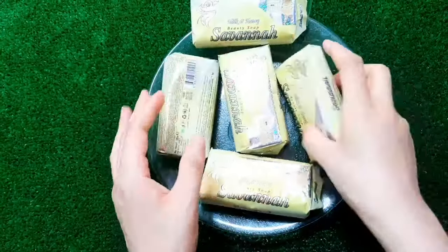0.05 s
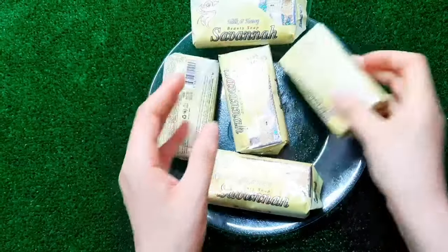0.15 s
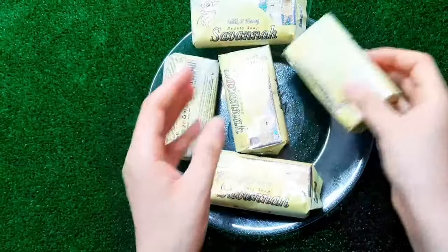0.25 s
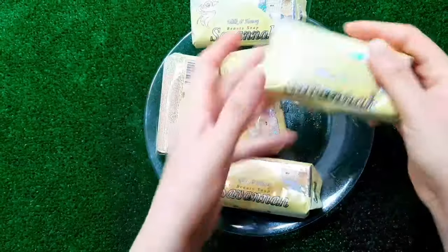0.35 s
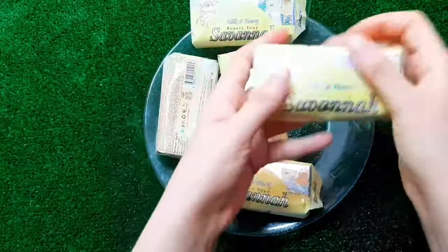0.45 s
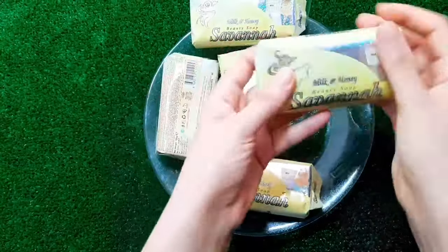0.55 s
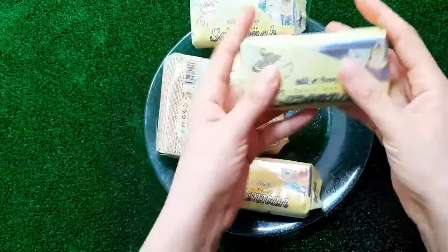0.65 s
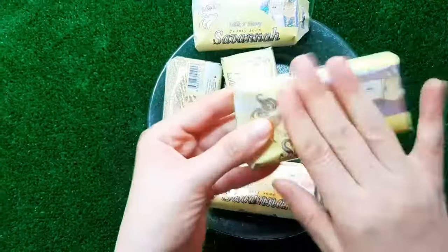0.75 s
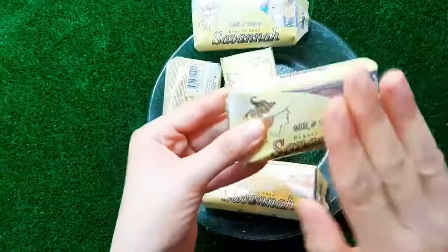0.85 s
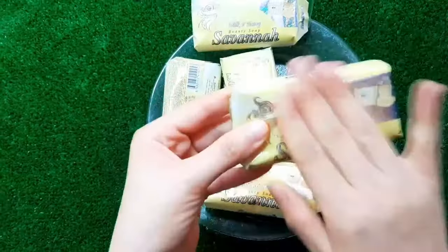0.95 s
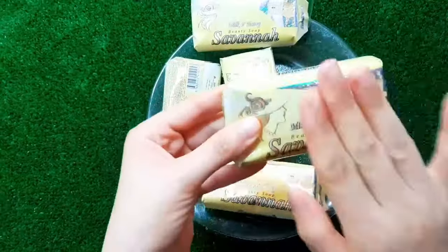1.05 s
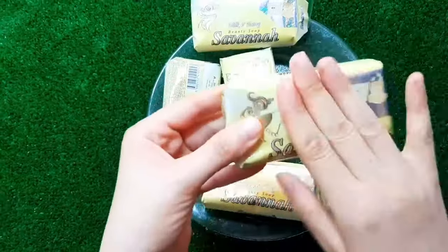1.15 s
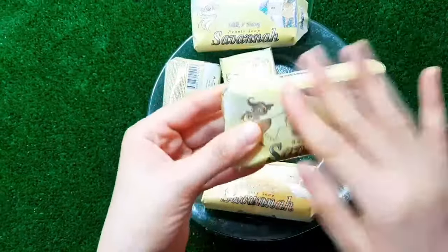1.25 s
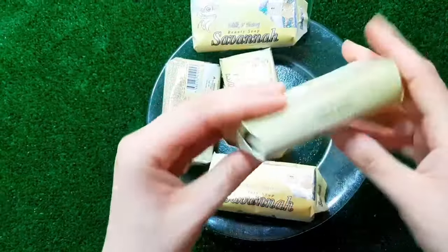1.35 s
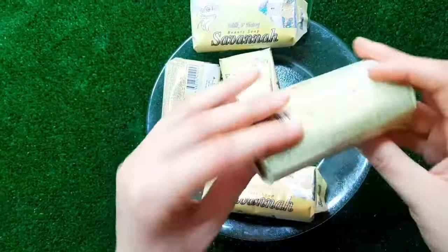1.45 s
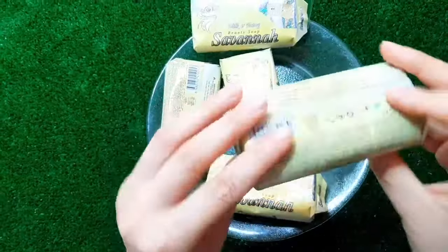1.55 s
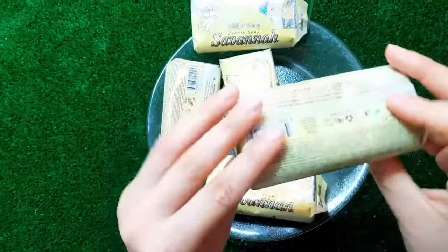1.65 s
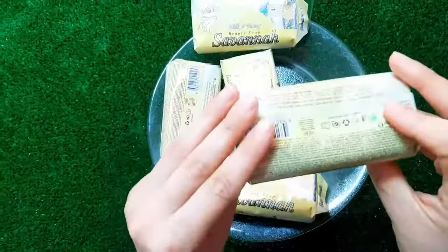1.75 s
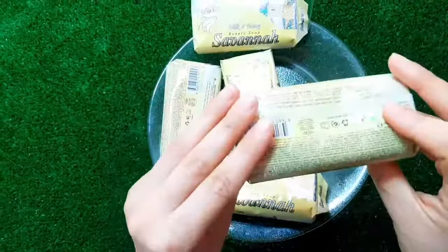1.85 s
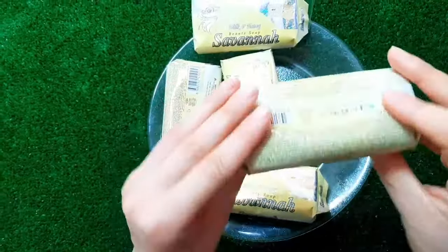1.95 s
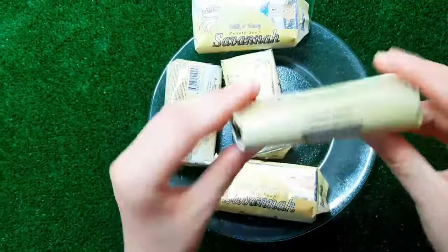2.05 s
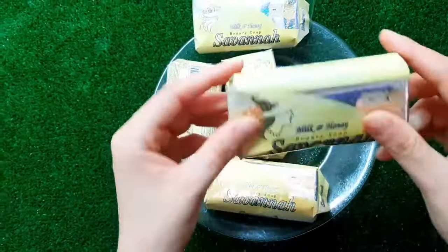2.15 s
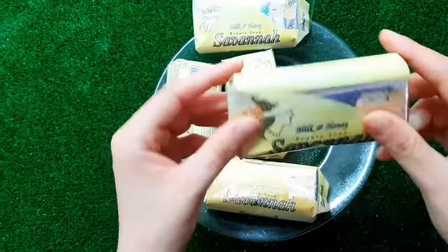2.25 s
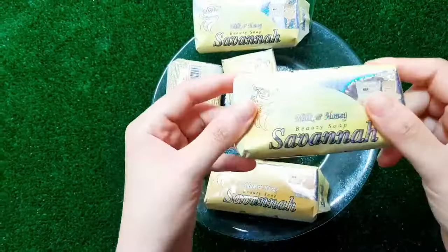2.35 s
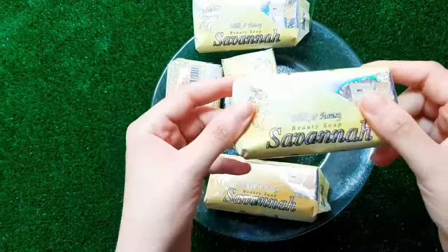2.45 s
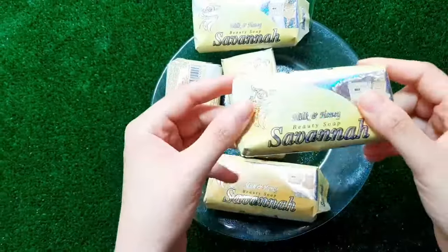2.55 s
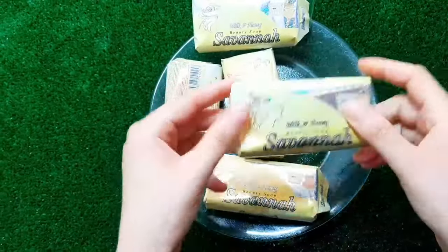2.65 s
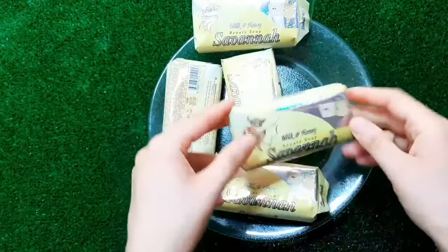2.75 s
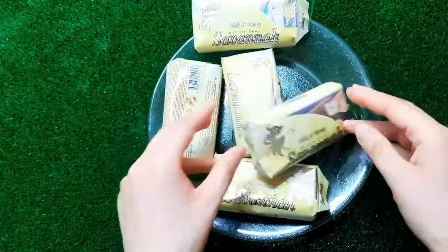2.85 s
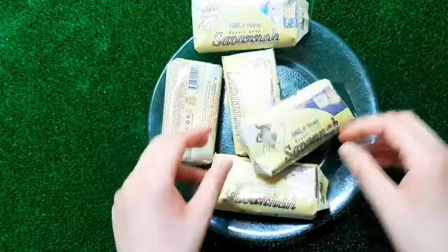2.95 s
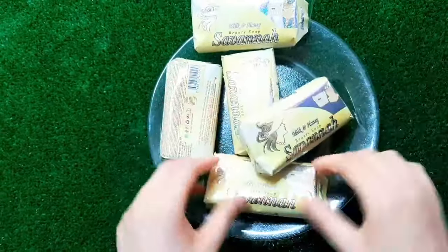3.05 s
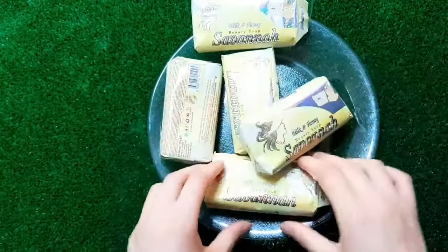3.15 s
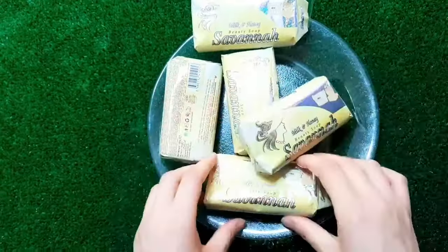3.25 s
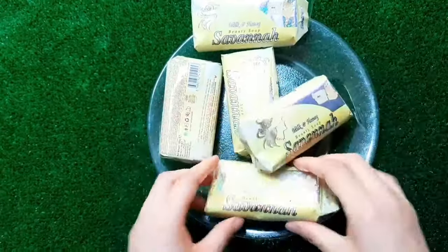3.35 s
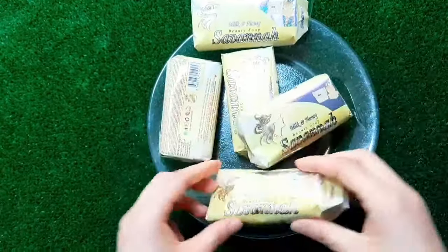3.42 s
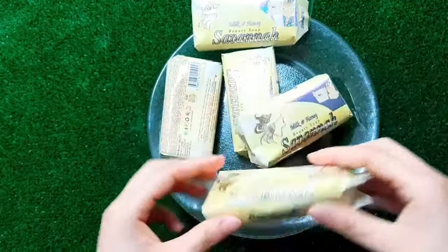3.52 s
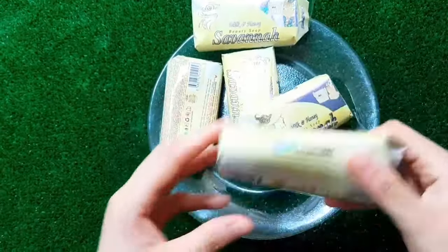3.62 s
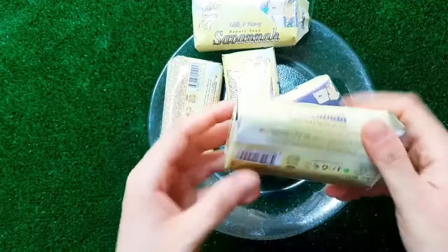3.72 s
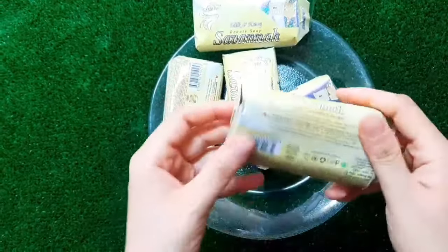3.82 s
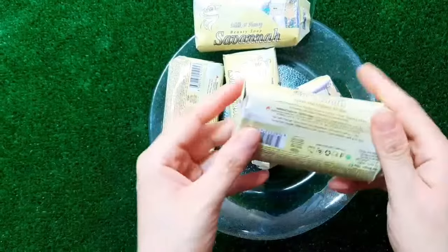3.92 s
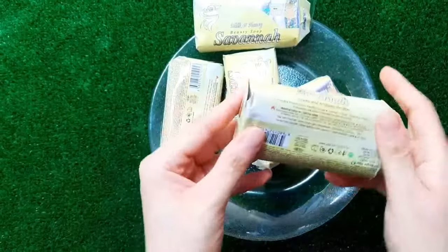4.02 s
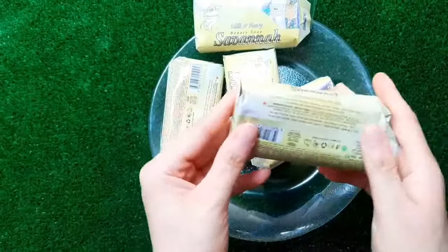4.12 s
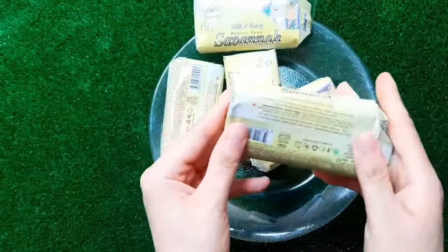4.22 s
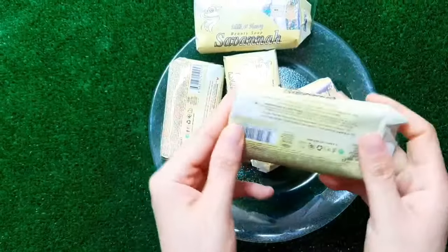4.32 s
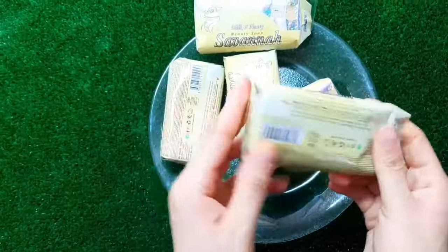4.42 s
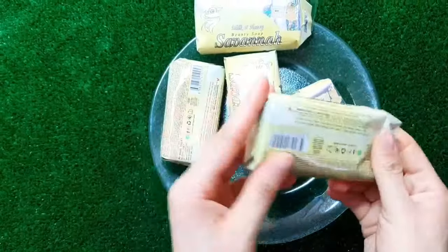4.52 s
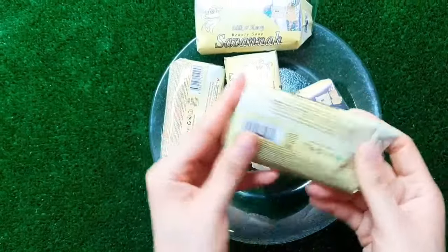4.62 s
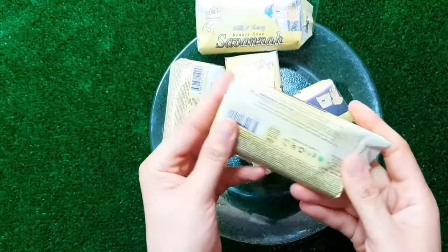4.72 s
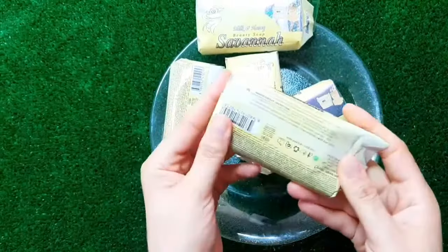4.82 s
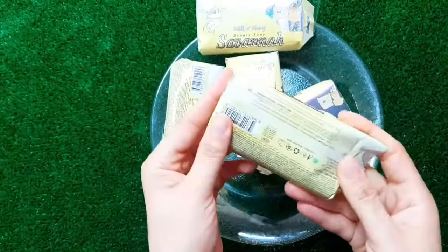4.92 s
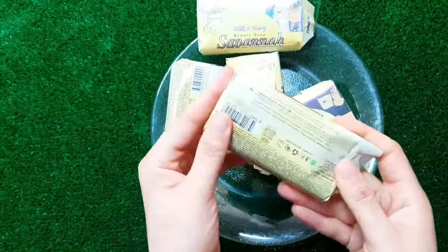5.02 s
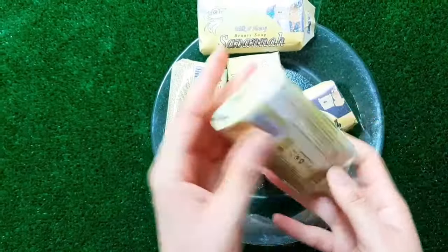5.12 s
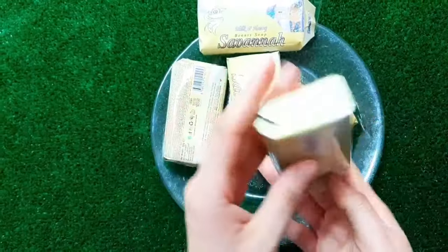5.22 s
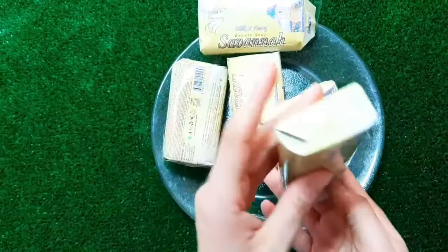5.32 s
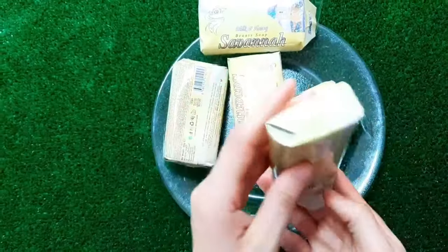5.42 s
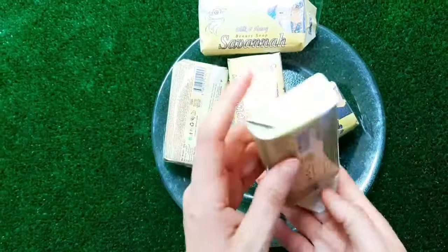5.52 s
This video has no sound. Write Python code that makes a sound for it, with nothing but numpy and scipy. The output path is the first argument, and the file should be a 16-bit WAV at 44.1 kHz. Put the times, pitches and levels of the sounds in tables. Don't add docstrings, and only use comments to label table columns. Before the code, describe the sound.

Hands turn and squeeze soap bars in stiff paper very close to the microphone. Soft rustling leads to three hard slaps within the first second or so, then sparse ticks. Near the middle a bar drops with a brief clank on a plate, followed by busy crinkling and snaps. Small, dry room; paper on the left, dull rumble on the right.

```python
import sys
import numpy as np
from scipy import signal
from scipy.fft import rfft, irfft
from scipy.io import wavfile
from scipy.ndimage import uniform_filter1d, map_coordinates

SR = 44100
rng = np.random.default_rng(int(sys.argv[2]) if len(sys.argv) > 2 else 0)


def volts_from_db(level):
    exponent = np.asarray(level, float) / 20
    return 10 ** exponent


def transcribe(u):
    v = np.clip(np.atleast_2d(u).T, -1, 1)
    q = np.round(v * 32767).astype(np.int16)
    wavfile.write(sys.argv[1], SR, q)


N = 245637
TIME = np.arange(N) / SR

# f/Hz, level/dB per Hz
CRACK = [(1200, -38.5), (2200, 5), (4000, 3), (6400, 5.5), (7600, -4.5), (9500, -35.5)]
SHEET = [(450, -31), (800, 0.5), (1200, 5), (1800, 2), (2600, -5.5), (4000, -43.5)]
THUD = [(70, -22.5), (180, -2.5), (350, 1), (550, -3.5), (780, -16), (1300, -37.5)]
SIZZLE = [(6000, -23.5), (8200, 1), (12000, 3.5), (15500, -2)]
# t/s, rumble level/dB
LEAN = [(0, -50), (0.4, -51), (1.0, -59), (2.4, -71), (2.6, -74.5), (2.8, -84), (3.0, -62.5), (3.4, -61.5),
        (3.8, -65), (4.0, -71), (4.4, -71), (4.6, -45.5), (4.8, -68.5), (5.0, -67), (5.57, -65.5)]


def unit(x):
    return x / np.sqrt(np.mean(x ** 2) + 1e-20)


def peak(x):
    return x / np.abs(x).max()


def along(points, hz):
    f, v = np.transpose(points)
    return np.interp(np.log(hz + 1), np.log(f + 1), v)


def curves(rows):
    s, *cols = np.transpose(rows)
    return [np.interp(TIME, s, c) for c in cols]


def wobble(rate):
    return map_coordinates(rng.standard_normal(int(N * rate / SR) + 4), [TIME * rate])


def coloured(x, spectrum, size=8192):
    cep = irfft(np.log(volts_from_db(along(spectrum, np.fft.rfftfreq(size, 1 / SR)))))
    cep[1:size // 2] *= 2
    cep[size // 2 + 1:] = 0
    h = irfft(np.exp(rfft(cep)))[:size // 2]
    h = h.reshape((1,) * (x.ndim - 1) + (-1,))
    return signal.fftconvolve(x, h, axes=-1)[..., :x.shape[-1]]


def noise(spectrum):
    return unit(coloured(rng.standard_normal(N), spectrum))


def add(track, s, piece):
    part = track[round(s * SR):][:len(piece)]
    part += piece[:len(part)]


def swells(rows):
    t = TIME[::15]
    gains = [volts_from_db(db - 20 * np.maximum((s - t) / rise, (t - s) / fall)) for s, db, rise, fall, *_ in rows]
    return np.repeat(gains, 15, axis=1)[:, :N]


def to_db(*gains):
    return 10 * np.log10(sum(np.sum(np.atleast_2d(g) ** 2, axis=0) for g in gains))


def walls(x, size=SR // 3):
    # f/Hz, t60/s
    decay = [(150, .11), (420, .22), (1500, .2), (4000, .18), (8000, .14), (15000, .13)]
    hz, t, z = signal.stft(rng.standard_normal(size), SR, nperseg=128)
    tail = signal.istft(z * volts_from_db(-60 * t / along(decay, hz)[:, None]), SR, nperseg=128)[1]
    tail = tail * (1 - np.exp(-np.arange(len(tail)) / SR / .002))
    return signal.fftconvolve(np.pad(x, (200, 0)), tail / np.linalg.norm(tail))


def burst(colour, t60, rise):
    t = np.arange(1536) / SR
    fade = volts_from_db(-60 * t / (.5 * t60)) + .3 * volts_from_db(-60 * (t / t60) ** 1.17)
    attack = (1 - np.exp(-t / rise)) ** 2
    return coloured(rng.standard_normal(len(t)) * fade * attack, colour, size=1024)


def pitched(x, hz, long):
    ring = signal.lfilter(*signal.iirpeak(hz, hz / 1500, SR), x)
    return min(hz / 4000, 1) ** 2 * x + 4.5 / long ** 1.2 * ring


def snaps():
    out = np.zeros(N)
    impulse = 1. * (np.arange(1536) == 0)
    clicks = [coloured(impulse, colour, size=1024) for colour in (CRACK, SHEET, THUD, SIZZLE)]
    for s, db, hz, sheet_db, thud_db, sizzle_db in buckles():
        long = 1 + 1.1 * volts_from_db(db)
        crack = peak(pitched(burst(CRACK, 0.0092 * long, 0.00008 * long), hz, long))
        sheet = volts_from_db(sheet_db - 1.74) * peak(burst(SHEET, 0.015 * long, 0.00006))
        thud = volts_from_db(thud_db - 0.9) * peak(burst(THUD, 0.016, 0.00024))
        sizzle = volts_from_db(sizzle_db + 2.5) * peak(burst(SIZZLE, 0.0044 * long, 0.00037))
        layers = crack, sheet, thud, sizzle
        direct = sum(layers)
        add(out, s - .0001, volts_from_db(db - 1.72) * direct)

        echo = np.convolve(direct, rng.standard_normal(130) * np.hanning(130))
        add(out, s + .0058, volts_from_db(db - 16.5) * peak(echo))

        smooth = [pitched(clicks[0], hz, long), *clicks[1:]]
        spread = sum(click * np.linalg.norm(x) / np.linalg.norm(click)
                     for click, x in zip(smooth, layers))
        size = SR // 3 if long > 1.2 else SR // 7
        add(out, s, volts_from_db(db - 17.5) * long * walls(spread, size))
    return out


def buckles():
    # t/s, crack peak level/dB, crack f/Hz, sheet level/dB re crack, bar thud level/dB re crack
    slaps = [(0.7491, -27, 5010, 2.5, 6), (0.751, -11, 2993, 1, 0.5), (0.7517, -2, 3800, -2.5, -6),
             (0.753, -5, 4600, -4.5, -3.5), (0.9617, -13.5, 3000, -3.5, -4.5),
             (0.9625, -3, 4000, -8.5, -10.5), (0.9631, -0.5, 4600, -6.5, -10.5), (1.129, -12, 2600, 0, -6),
             (1.13, -1, 4286, -12, -14.5), (1.1323, -9, 5940, -8, -7.5), (2.8205, -23.5, 5200, 6.5, -18.5),
             (2.826, -3, 3500, -7.5, -14), (3.4767, -1.5, 3920, -4.5, -24.5),
             (3.632, -17.5, 4130, -4.5, -19), (4.2856, -15, 4700, -3.5, -41)]
    presses = [(0.049, -39.5, 3260, -18, 2), (0.495, -22, 3800, -6, -14), (0.577, -18, 2330, 5.5, 1),
               (2.1786, -11, 3950, -2, -18.5), (2.8157, -9.5, 3670, 0, -22.5),
               (2.8185, -9, 2580, 0.5, -17.5), (2.8442, -16.5, 3630, -13, 1),
               (2.852, -14.5, 3300, -5.5, -7.5), (2.886, -22.5, 3650, -0.5, -16),
               (2.978, -20.5, 2300, -3, -11.5), (3.0845, -48, 4880, 14, -8.5), (3.4053, -34, 2730, 19, 2.5),
               (3.4724, -41, 2300, 9, -10), (3.483, -11.5, 5070, -2.5, -11.5), (3.609, -49.5, 3800, -5, 14),
               (3.8316, -20.5, 4800, 5.5, -12.5), (4.314, -21, 3400, -3.5, -10.5),
               (4.706, -32, 4000, 0.5, -10), (4.663, -31.5, 2300, 6, -5), (5.093, -28, 4250, 0, -1.5),
               (1.29, -9.5, 4050, -17.5, -49.5)]
    # t/s, crack peak level/dB, crack f/Hz, sheet level/dB re crack
    folds = [(0.21, -38, 5400, -1), (0.565, -53, 3400, 23), (0.708, -49.5, 3100, 20),
             (0.7174, -18, 4900, -6), (1.342, -24.5, 2610, -5), (2.1553, -39, 2300, 5),
             (2.627, -36, 5640, -25), (2.692, -38, 2310, -4), (2.738, -45.5, 2300, 18),
             (2.763, -30, 6740, -5), (2.889, -23.5, 2300, 7), (3.045, -41, 3300, 8.5),
             (3.099, -23, 3030, -14), (3.757, -28.5, 2860, -2.5), (3.808, -37, 2600, 4),
             (3.8146, -18, 4600, -9), (3.908, -18.5, 3320, -4), (3.948, -19, 3250, -14.5),
             (4.0471, -42.5, 2980, 9), (4.1956, -18, 3500, -3.5), (4.2403, -22.5, 3220, -13),
             (4.2645, -36, 2328, 18.5), (4.899, -51, 6000, 0), (4.955, -49, 2970, 4),
             (5.0655, -44, 2280, -8), (5.1293, -43, 2330, 0), (5.31, -16.5, 3780, -3.5),
             (5.36, -35.5, 3000, 5.5), (5.412, -33, 2400, 5.5), (5.44, -26, 2600, -12),
             (1.332, -34, 2300, 5), (1.357, -26, 2600, 0), (3.7306, -28, 2380, -4), (3.742, -34.5, 2300, 6),
             (3.823, -35, 3400, 2), (3.987, -51, 2800, -8), (4.992, -49, 3920, -5), (4.078, -34.5, 2300, 5),
             (4.089, -32, 3000, -4), (4.205, -37.5, 3880, -6), (5.113, -40, 2570, -9),
             (5.147, -36, 2300, -14), (5.25, -32.5, 2300, 1)]
    # t/s, crack peak level/dB, crack f/Hz, sizzle level/dB re crack
    ticks = [(0.1418, -43, 6360, -18), (0.483, -28.5, 6600, -5), (0.656, -22.5, 5530, -14),
             (1.2544, -23.5, 2950, -19), (1.466, -37.5, 4970, -13.5), (1.5662, -25, 6420, -16.5),
             (2.0142, -36.5, 6250, -10), (2.0335, -32, 6000, -4), (2.043, -26, 6500, -8),
             (2.0576, -16, 6600, -10), (2.169, -25.5, 4840, -10), (2.66, -35, 4780, -17),
             (2.937, -32, 3120, -20), (3.2933, -25.5, 2950, -17), (3.727, -26.5, 4370, -6),
             (3.7409, -45, 5130, -14), (3.854, -14.5, 5500, -19), (3.858, -23, 6300, -20),
             (4.009, -31.5, 5000, -15), (3.011, -36, 4900, -15), (3.106, -24, 3000, -33.5),
             (4.099, -21.5, 5300, -2), (5.462, -37, 1900, -23.5), (4.37, -14.5, 3130, -21.5),
             (4.4683, -28.5, 4300, -10.5), (4.5852, -12.5, 5900, -16.5), (4.6347, -23.5, 2850, -13),
             (4.6415, -24, 5630, -14), (4.656, -27, 2300, -16), (4.522, -47.5, 6500, -16),
             (5.2575, -20, 4150, -11), (3.793, -41, 2900, -14), (4.181, -53, 5350, -10),
             (4.275, -33, 5470, -18), (4.564, -52, 5980, -14), (5.368, -36, 6060, -19)]

    def sizzle(db, hz):
        return db + 2 * np.log2(hz / 4000)

    rows = [(*row, -13 + 0.5 * row[3]) for row in slaps]
    rows += [(*row, sizzle(-21.5, row[2])) for row in presses]
    rows += [(*row, row[3] - 24.5, sizzle(-24.5, row[2])) for row in folds]
    rows += [(s, db, hz, -18.5, -33, sizzle_db) for s, db, hz, sizzle_db in ticks]
    return rows


def rustle():
    level_db, sheet_db, sizzle_db = rubbing()
    clumps = volts_from_db(2.2 * wobble(45) + 2.6 * wobble(170))

    def layer(colour, grains, rub):
        rough = clumps * (grains + rub * rng.standard_normal(N))
        return unit(volts_from_db(1.5 * wobble(60)) * coloured(rough, colour))

    bright = layer(CRACK, creases(260, [2300, 3000, 3900, 5000, 6300], sharpness=3), rub=.55)
    sheet = layer(SHEET, creases(200, [850, 1150, 1550, 2000], sharpness=5), rub=.65)
    thud = layer(THUD, 0, rub=1)
    sizzle = layer(SIZZLE, creases(500, [11000], sharpness=0.52), rub=0.99)
    paper = bright + volts_from_db(sheet_db) * (sheet + 0.59 * thud) + volts_from_db(sizzle_db) * sizzle
    paper = volts_from_db(level_db - 5.0) * unit(patchy(paper, depth_db=2.0)) * np.std(paper)
    return paper + volts_from_db(-6) * walls(paper)[:N]


def rubbing():
    # t/s, rustle level/dB
    firmness = [(0, -59.5), (0.39, -62), (0.45, -44), (0.68, -50.5), (0.9, -62), (1.27, -58), (1.5, -58.5),
                (1.7, -83), (1.99, -71), (2.22, -65), (2.3, -95), (2.62, -56), (3.3, -62.5), (4.43, -53),
                (4.74, -70.5), (5.05, -58), (5.4, -59), (5.57, -78.5)]
    # t/s of the peak, peak level/dB, rise/s, fall/s (20 dB each),
    # sheet level/dB re rustle
    slides = [(0.01, -47.5, 0.11, 0.12, 5), (0.416, -33, 0.0097, 0.045, -2.5),
              (1.359, -36.5, 0.1, 0.07, -4), (2.06, -41.5, 0.05, 0.16, -10.5),
              (2.012, -51.5, .006, .05, -2), (2.765, -45, 0.04, 0.39, -5), (2.93, -46.5, 0.23, 0.27, 3.5),
              (3.119, -41, 0.04, 0.054, -1.5), (3.306, -44.5, 0.088, 0.14, -4),
              (3.459, -48, 0.26, 0.43, 3.5), (3.638, -44.5, 0.037, 0.073, -1),
              (3.739, -31.5, 0.024, 0.02, -2), (4.049, -40, .008, 0.082, -1.5),
              (3.96, -46.5, .008, 0.044, -2), (5.0, -52.5, .03, .15, -2.5), (4.085, -40, 0.075, 0.062, 2.5),
              (4.29, -46, .17, 0.23, 1.6), (4.61, -45, 0.049, .1, -6.5), (4.658, -36, 0.055, 0.04, 0),
              (4.707, -40.5, .012, .02, 0), (5.11, -44.5, 0.12, 0.18, -2.5),
              (5.151, -39, 0.057, 0.035, -1.5), (5.259, -41, 0.041, 0.11, -7.5),
              (5.451, -49.5, 0.095, 0.06, -3.5), (2.789, -50, 0.054, 0.041, 8),
              (2.861, -36, 0.014, .07, 8.5), (2.89, -39.5, 0.023, .04, 7.5),
              (2.921, -46.5, .01, 0.026, 10.5), (3.416, -41, 0.012, .06, 10.5),
              (4.271, -40.5, 0.0063, .04, -1.5), (5.32, -46.5, 0.0088, 0.056, 4.5)]
    grip = volts_from_db(curves(firmness)[0])
    strokes = swells(slides)
    wide_db = np.array(slides)[:, -1:]
    thin_db = -11.5 - 0.51 * wide_db
    level_db = to_db(grip, strokes)
    sheet_db = to_db(grip * volts_from_db(-5.5), strokes * volts_from_db(wide_db)) - level_db
    sizzle_db = to_db(grip * volts_from_db(-8.5), strokes * volts_from_db(thin_db)) - level_db
    return level_db, sheet_db, sizzle_db


def creases(rate, pitches_hz, sharpness):
    out = np.zeros(N)
    for hz in pitches_hz:
        sizes = volts_from_db(2.8 * np.minimum(rng.exponential(size=N), 2.7))
        ticks = sizes * rng.choice([-1, 1], N) * (rng.random(N) < rate / SR)
        out += unit(signal.lfilter(*signal.iirpeak(hz, sharpness, SR), ticks))
    return unit(out)


def patchy(x, depth_db):
    z = signal.stft(x, nperseg=256)[2]
    field = uniform_filter1d(rng.standard_normal(z.shape), size=6, axis=0)
    field = uniform_filter1d(field, size=16, axis=1)
    return signal.istft(z * volts_from_db(depth_db * unit(field)), nperseg=256)[1][:N]


def plate():
    # t/s, level/dB, contact/s
    landings = [
        (2.8234, -1, .0135),
        (2.8497, -8, 0.0021),
    ]
    # f/Hz, level/dB, t60/s
    modes = [(1603, 4.5, 0.012), (1449, -7, 0.019), (1993, -8, .02), (1100, -14.5, 0.0226),
             (737, -20, 0.23)]
    out = np.zeros(N)
    t = np.arange(SR // 2) / SR

    def rock():
        return map_coordinates(rng.standard_normal(200), [t * 330])

    for s, db, contact in landings:
        free = np.maximum(t - contact, 0)
        ring = np.zeros(len(t))
        for hz, level, t60 in modes:
            fade_db = level + 0.58 * rock() - 60 * free / t60 - 240 * np.minimum(t, contact)
            ring += volts_from_db(fade_db) * np.sin(2 * np.pi * hz * t + 0.3 * rock())
        ring = ring * (1 - np.exp(-t / .0004))
        add(out, s, volts_from_db(db - 4.5) * ring)
        add(out, s, volts_from_db(db - 20.5) * walls(ring))
    return out


def booms():
    # t/s, f/Hz, peak level/dB, t60/s, rise/s
    pushes = [(.7515, 801, -13.5, 0.071, 0.0009), (0.7525, 340, -20, 0.13, 0.0016),
              (0.9635, 367, -19, 0.093, 0.00081), (1.1292, 356.5, -23, 0.14, 0.00056),
              (1.1298, 988, -15.5, 0.054, 0.00063), (2.852, 140, -21, 0.23, 0.0012),
              (3.006, 144, -32, 0.2, 0.0041), (3.406, 589, -21, 0.042, 0.00092),
              (3.407, 916, -20.5, 0.028, 0.0018), (4.49, 144.2, -37.5, 0.41, 0.017),
              (4.509, 93, -36, 0.48, 0.032), (4.578, 770, -36, 0.14, 0.003), (4.59, 862, -41, 0.14, 0.0034),
              (5.4119, 1850, -23, 0.0037, 0.00032)]
    out = np.zeros(N)
    t = np.arange(SR // 2) / SR
    for s, hz, db, t60, rise in pushes:
        drift = map_coordinates(rng.standard_normal(200), [t * hz / 7])
        tone = np.sin(2 * np.pi * hz * t + min(hz / 90, 7) * t ** .5 * drift)
        close = np.cos(np.pi * t)
        add(out, s, volts_from_db(db - 60 * t / t60) * (1 - np.exp(-t / rise)) * tone * close)
    return out


def whines():
    tones = [
        (0.14, .26, 2690, -64),
        (1.636, 1.936, 899, -69),
        (3.556, 3.65, 844, -48.5),
        (3.914, 4.198, 484, -51),
        (4.578, 4.904, 787, -66),
    ]
    out = np.zeros(N)
    shimmer_db = 3.5 * wobble(70)
    slip = 1.4 * wobble(130)
    for start, end, hz, db in tones:
        swell = np.sin(np.pi * np.clip((TIME - start) / (end - start), 0, 1)) ** .5
        out += volts_from_db(db + shimmer_db) * swell * np.sin(2 * np.pi * hz * TIME + slip)
    return out


def table():
    jolts = [
        (0, -43.5, .1, 0.4),
        (3.0, -47.5, 0.38, 0.097),
        (4.8, -55, 0.12, 0.59),
    ]
    rumble_db, = curves(LEAN)
    hum_db = -57 + 0.88 * (rumble_db + 58)
    jolt_db = to_db(swells(jolts))
    rumble = volts_from_db(rumble_db - 2.5) * noise([(15, -30), (35, 8.5), (60, -2.5), (95, 6.5), (130, -41)])
    hum = volts_from_db(hum_db - 5.5) * noise([(120, -32.5), (160, -7.0), (185, 6), (250, -4), (300, -40.5)])
    jolt = volts_from_db(jolt_db) * noise([(110, -28.5), (143, 3.5), (185, -2), (230, -48.5)])
    return rumble + hum + jolt


def room_air():
    # f/Hz, level/dB
    tone = [(30, -21), (140, 0.5), (200, -4), (330, -14), (800, -15.5), (1250, -30.5), (6300, -31),
            (8000, -48)]
    rumble_db, = curves(LEAN)
    return volts_from_db(-59.5 + 0.52 * (rumble_db + 65) + 0.57 * wobble(6.4)) * noise(tone)


def bumps():
    # t/s, peak level/dB, f/Hz, polarity, length/cycles
    knocks = [
        (1.5048, -14, 254, 0.7, 0.4),
        (1.5155, -14, 118.5, 0.65, 0.45),
        (3.797, -30, 96, 0.86, 0.27),
        (4.499, -25, 76.5, 0.79, 0.27),
        (4.642, -40, 98.5, 0.98, 0.86),
        (5.036, -14.5, 119, 0.81, 0.24),
        (5.138, -22.5, 110, -1.14, 0.52),
        (5.269, -21.5, 118, -0.84, 0.63),
        (5.361, -22.5, 115, -0.88, 0.46),
    ]
    out = np.zeros(N)
    for s, db, hz, sign, cycles in knocks:
        turn = (TIME - s) * hz
        before = np.exp(-(turn / (.8 * cycles)) ** 2)
        after = np.exp(-np.abs(turn) / (1.5 * cycles))
        fade = np.where(turn < 0, before, after)
        slowing = 1 + 0.077 * np.clip(turn, 0, 4)
        out += sign * volts_from_db(db) * fade * np.cos(2 * np.pi * turn / slowing)
    return out - uniform_filter1d(uniform_filter1d(out, size=700), size=700)


def covered_rumble():
    # t/s of the peak, level/dB, rise/s, fall/s (20 dB each)
    nudges = [
        (0, -53, .3, 0.6),
        (.4, -50.5, 0.41, 0.86),
        (2.8, -52, 0.33, 0.44),
        (3.45, -51.5, 0.7, 1.4),
        (4.55, -48, 0.4, 0.25),
        (5.3, -52.5, 1, 0.3),
    ]
    # f/Hz, level/dB
    muffled = [(18, -31), (45, 4), (110, -1), (145, -7), (190, -15.5), (420, -32.5), (900, -48.5),
               (3000, -49)]
    level_db = to_db(volts_from_db(-53.5), swells(nudges))
    return volts_from_db(level_db + 1.5 * wobble(12)) * noise(muffled)


def leak(paper):
    # f/Hz, level/dB
    cover = [(100, -34), (700, -54), (1600, -58), (4500, -50), (7000, -64)]
    return coloured(paper, cover)


def scene():
    paper = snaps() + rustle() + plate() + booms()
    left = paper + table() + whines() + room_air()
    right = covered_rumble() + bumps() + leak(paper)
    return np.array([left, right])


def top_cut(x):
    return signal.sosfilt(signal.butter(12, 16670, fs=SR, output="sos"), x)


def record(dry):
    # f/Hz, level/dB
    hiss = [(200, -2.5), (3500, -5.5), (8000, -7), (14000, -2.5)]
    # start t/s, end t/s, level/dB
    dips = [
        (0.732, 0.748, -27),
        (1.113, 1.122, -5),
    ]
    # f/Hz, level/dB
    band = [(15700, 0), (15950, -22), (16700, -30), (16900, -90)]
    x = dry + volts_from_db(-69.0) * np.array([noise(hiss), noise(hiss)])
    for start, end, db in dips:
        inside = 1. * (TIME > start) * (TIME < end)
        x[0] *= volts_from_db(db * uniform_filter1d(inside, size=60))
    x = x / (1 + np.abs(x / .92) ** 8) ** (1 / 8)
    return top_cut(coloured(x, band))


dry = scene()
out = record(dry)
transcribe(out)
```